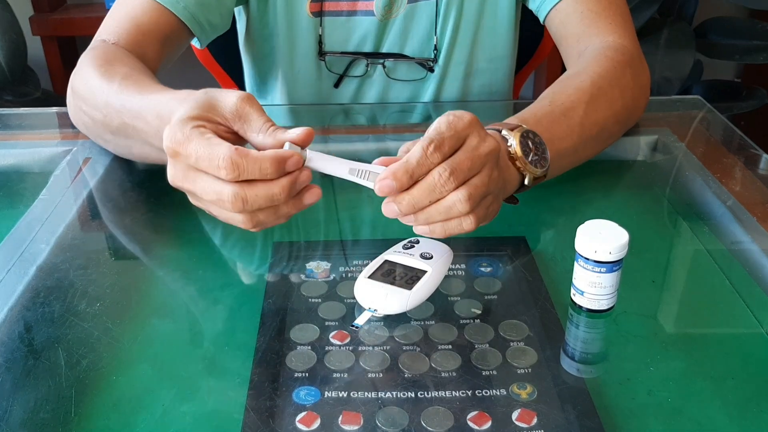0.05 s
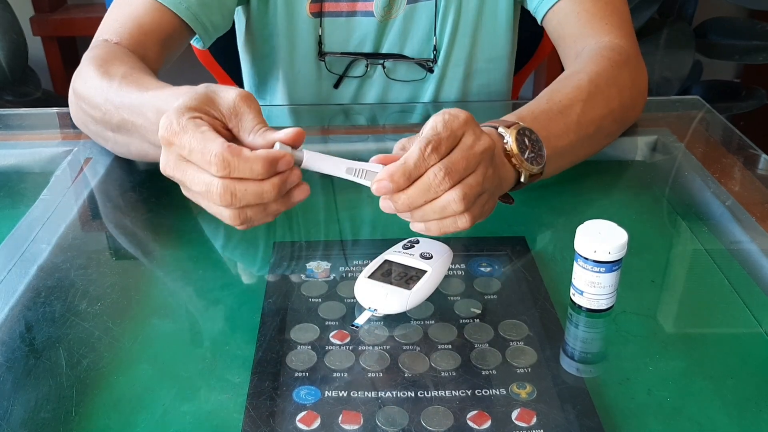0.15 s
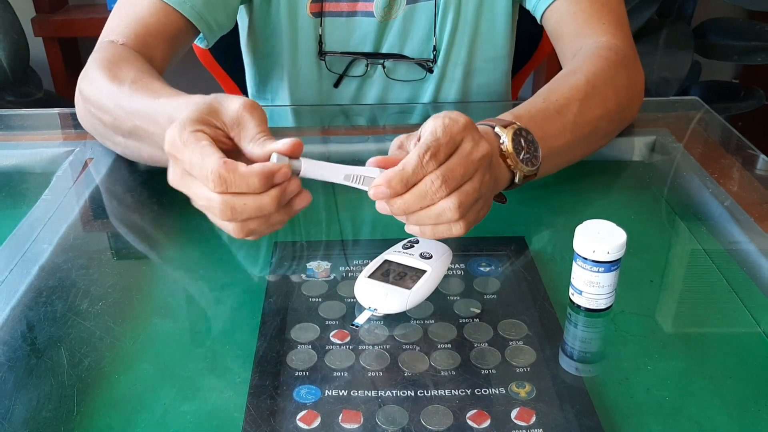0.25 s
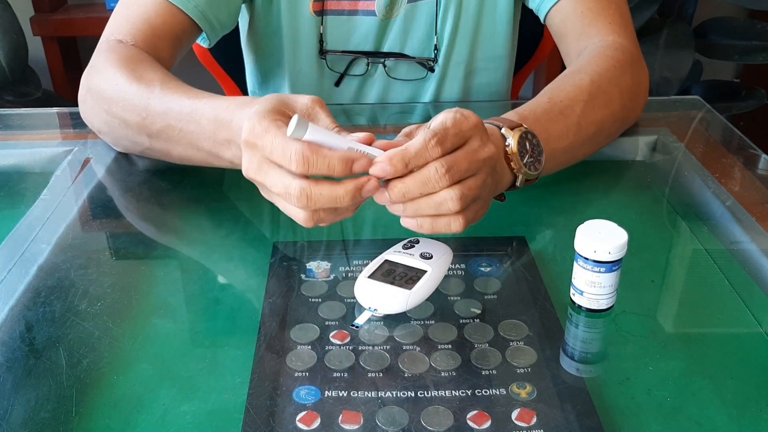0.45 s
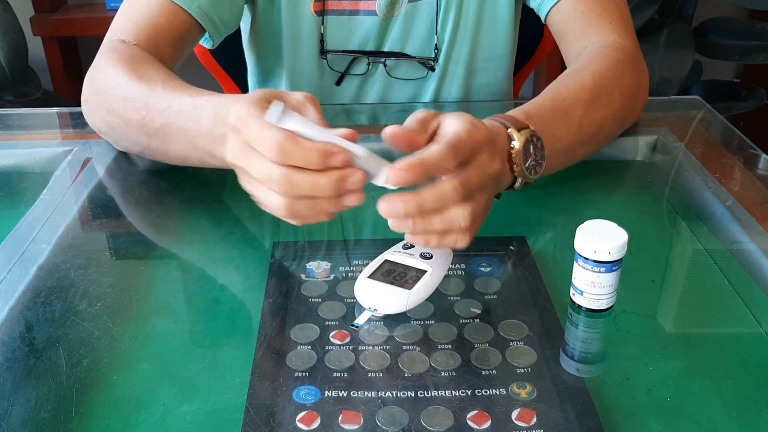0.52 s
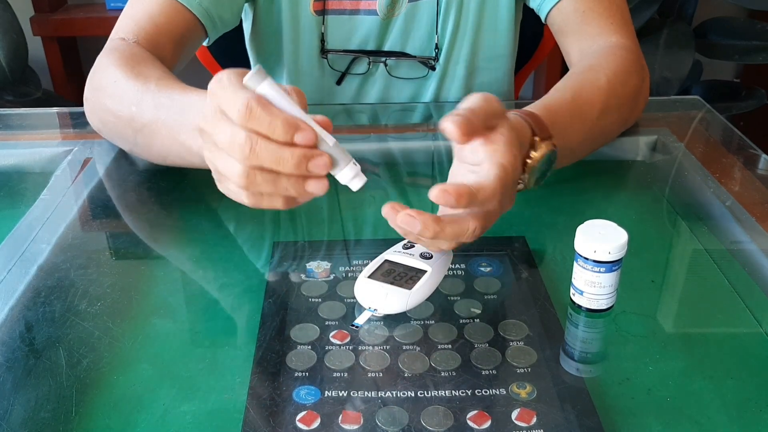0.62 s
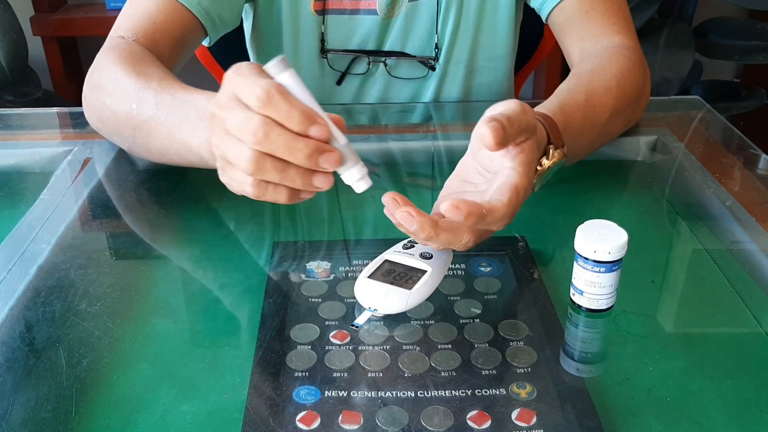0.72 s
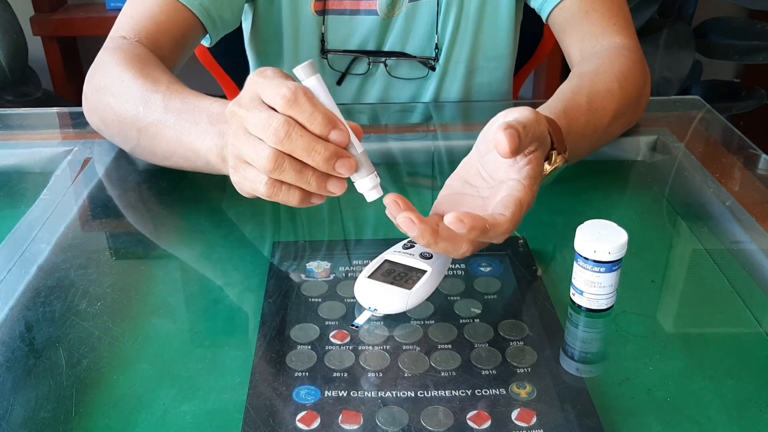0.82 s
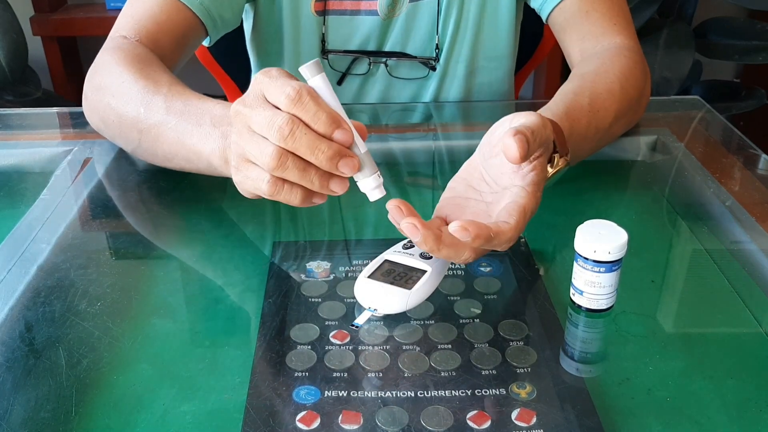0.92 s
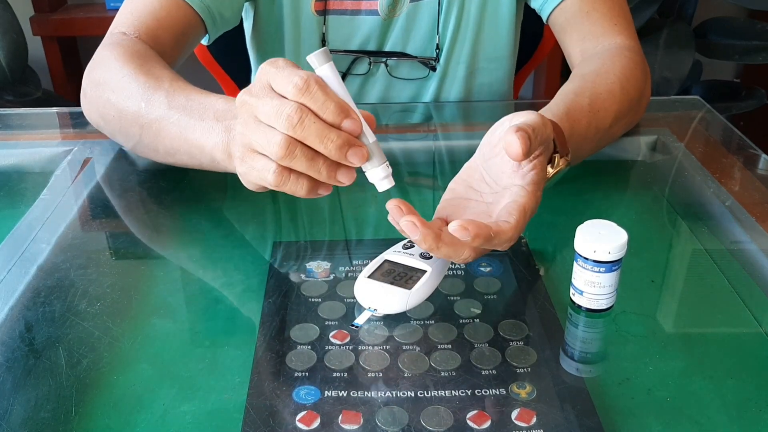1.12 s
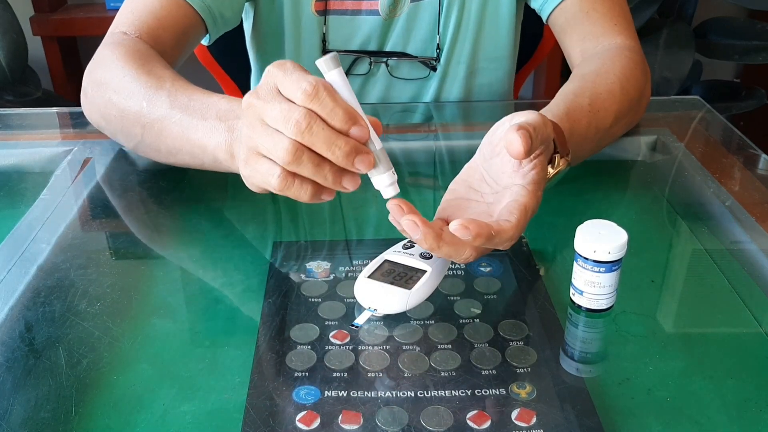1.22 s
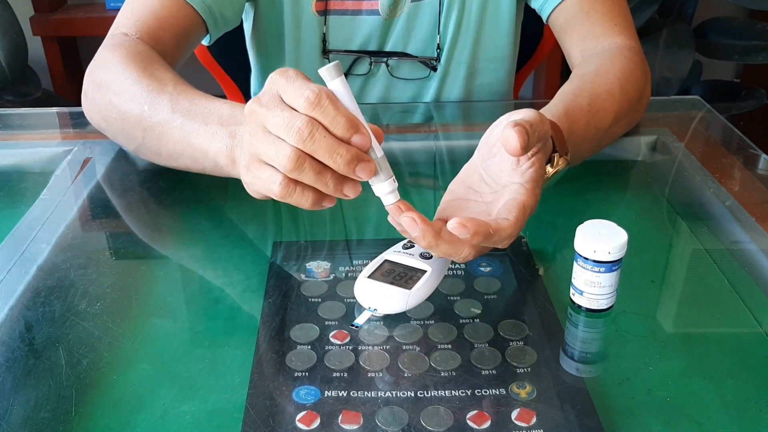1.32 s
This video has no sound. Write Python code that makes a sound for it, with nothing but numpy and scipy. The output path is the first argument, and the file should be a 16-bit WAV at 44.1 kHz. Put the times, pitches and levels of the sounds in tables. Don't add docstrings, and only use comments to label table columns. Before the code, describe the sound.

A spring-loaded plastic pen device is cocked: a small click, then a sharp snap, in a hard room

```python
import sys
import numpy as np
from scipy import signal
from scipy.fft import rfft, irfft, next_fast_len
from scipy.io import wavfile
from scipy.ndimage import uniform_filter1d, map_coordinates

SR = 44100
rng = np.random.default_rng(int(sys.argv[2]) if len(sys.argv) > 2 else 0)


def to_wav(s):
    ch = np.atleast_2d(s).T
    pcm = np.round(np.clip(ch, -1, 1) * 32767)
    wavfile.write(sys.argv[1], SR, pcm.astype(np.int16))


def amplitude_ratio(level_db):
    exponent = np.asarray(level_db, float) / 20
    return 10 ** exponent


N = 59535

# (pitch [Hz], width [Hz], level [dB])
SHELL_TONES = [(246.5, 460, -22.5), (1040, 220, -9), (1907, 170, -6), (2620, 450, -4.5), (3500, 500, -3.5),
               (4300, 580, 11), (6480, 1200, 1.5), (8610, 2700, 0.5), (10240, 1200, 4), (12300, 2200, 2),
               (14870, 1500, 1.5)]
LEFT_RIGHT = np.array([[1], [-1]])
SWAY_DB = 1.2


def unit(x):
    return x / np.sqrt(np.mean(x ** 2) + 1e-20)


def along(points, hz):
    f, value = np.transpose(points)
    return np.interp(np.log(hz + 1), np.log(f + 1), value)


def wobble(rate):
    knots = rng.standard_normal(int(N / SR * 40) + 4)
    return map_coordinates(knots, [np.arange(N) * rate / SR])


def filtered(x, response):
    m = next_fast_len(x.shape[-1] + 8192)
    spectrum = rfft(x, m) * response(np.fft.rfftfreq(m, 1 / SR))
    return irfft(spectrum, m)[..., :x.shape[-1]]


def resonances(peaks):
    def response(f):
        total = 0
        for k, (centre, width, db) in enumerate(peaks):
            damping = 1j * f * width
            total = total + (-1) ** k * amplitude_ratio(db) * damping / (centre ** 2 - f ** 2 + damping)
        return total
    return response


def rush(gain):
    # (pitch [Hz], likeness [-1 to 1])
    likeness = [(60, 0.74), (180, 0.83), (550, 0.46), (1650, -0.28), (4970, -0.16), (15000, -0.47)]

    def mid_side_gain(hz):
        turn = np.arccos(np.clip(along(likeness, hz), -1, 1)) / 2
        return gain(hz) * [np.cos(turn), np.sin(turn)]
    mid, side = filtered(rng.standard_normal((2, N)), mid_side_gain)
    return unit(np.array([mid + side, mid - side]))


def burst(length_s, alike):
    dies_s, right_lag_s = .007, .00013
    t = np.arange(2048) / SR
    fade = amplitude_ratio(-60 * np.maximum(t - length_s, 0) / dies_s)
    shape = np.sqrt(np.minimum(t / 0.000067, 1) * fade)
    z = rfft(rng.standard_normal((2, 2048)) * shape ** 2)
    evenness = np.sqrt(abs(uniform_filter1d(abs(z) ** 2, size=24, axis=1)) + 1e-9)
    a, b = irfft(z / evenness) * shape * np.sqrt(length_s * SR)
    turn = np.arccos(np.clip(alike, -1, 1)) / 2
    mid, side = np.cos(turn) * a, np.sin(turn) * b
    pair = np.array([mid + side, mid - side])
    return filtered(pair, lambda hz: np.exp(-2j * np.pi * hz * right_lag_s * np.array([[0], [1]])))


def room(x, t60_s, gap_s, build_s):
    hz, t, z = signal.stft(rng.standard_normal((2, SR * 3 // 4)), SR, nperseg=256)
    tail = signal.istft(z * amplitude_ratio(-60 * t / t60_s(hz)[:, None]), SR, nperseg=256)[1]
    t = np.arange(tail.shape[1]) / SR
    tail = tail * np.clip((t - gap_s) / build_s, 0, 1) ** .5
    return signal.fftconvolve(x[None], tail / np.linalg.norm(tail[0]), axes=1)


def add(out, x, s):
    i = round(s * SR)
    x = x[:, max(-i, 0):][:, :N - max(i, 0)]
    out[:, max(i, 0):max(i, 0) + x.shape[1]] += x


def in_room(s, sound, colour):
    # (pitch [Hz], time to fall 60 dB [s])
    ring_time = [(300, 0.54), (1000, .38), (2000, 0.31), (4000, 0.31), (8000, .3), (14000, .26)]
    out = np.zeros((2, N))
    add(out, sound, s)
    echoes = room(np.ones(1), lambda hz: along(ring_time, hz), gap_s=.004, build_s=.009)
    add(out, filtered(echoes, colour), s)
    return out


def echo_gain(db, length_s):
    return amplitude_ratio(db) * np.sqrt(length_s * SR) * 20


def clicks():
    # (level [dB], treble over bass [dB], barrel ring [dB], room [dB], knock [dB])
    contacts = [
        (-55, 5.5, -19, 2.5, 4),
        (-35.5, 1, 1, 3.5, 0.5),
        (-46.5, -1, 4, 6, -2),
        (-17, 5, -0.5, 4, -7.5),
    ]
    contact_times = [.1378, .2169, .3797, .4286]
    rattle_lengths = [.003, .0045, .002, .001]
    shell_pitches = [1.0, .89, .94, 1.0]
    # (pitch [Hz], width [Hz], level [dB])
    knock_tones = [(231, 520, 10), (986, 190, 26), (1574, 240, 28)]
    # (pitch [Hz], level [dB])
    room_colour = [(300, -21), (1000, -5), (2050, 3), (3200, -1.5), (4400, 0.5), (6000, -6), (11500, -4.5),
                   (15500, -9)]
    wet_db, room_ring_db = -24.5, -0.5
    out = np.zeros((2, N))
    jolt = np.eye(1, 2048) * amplitude_ratio(1.5 * LEFT_RIGHT)
    barrel = resonances([(2060, 200, 0)])
    for s, length, pitch, contact in zip(contact_times, rattle_lengths, shell_pitches, contacts):
        db, tilt_db, ring_db, echo_db, knock_db = contact

        def tilt(hz):
            return tilt_db * np.log2((hz + 1) / 4000) / 2
        shell = resonances([(c * pitch, w, g + tilt(c)) for c, w, g in SHELL_TONES])
        rattle = burst(length, alike=0.23)
        sound = filtered(rattle, lambda hz: shell(hz) + amplitude_ratio(11 + ring_db) * barrel(hz))
        wet = echo_gain(db + wet_db + echo_db, length)

        def colour(hz):
            walls = amplitude_ratio(along(room_colour, hz) + tilt(hz))
            return wet * (walls + amplitude_ratio(room_ring_db + ring_db / 2) * abs(barrel(hz)))
        out += in_room(s, amplitude_ratio(db + 2.5) * sound, colour)
        knock = amplitude_ratio(db + knock_db) * filtered(jolt, resonances(knock_tones))
        add(out, knock, s + length / 2)
    return out


def slide():
    out = np.zeros((2, N))
    scrape = filtered(burst(.008, alike=0), resonances(SHELL_TONES))
    add(out, amplitude_ratio(-52) * scrape, .4205)
    return out


def creaks():
    slip_levels = [
        -48.5,
        -64.5,
        -55,
        -47.5,
        -55,
    ]
    slip_times = [.1252, .1355, .147, .163, .187]
    slip_lengths = [.005, .007, .012, .0095, .008]
    creak_hz, wet_db = 1588, -33.5
    out = np.zeros((2, N))
    grip = resonances([(creak_hz, 200, 17), (1000, 300, 8), (2200, 900, 13)])
    t = np.arange(1024) / SR
    for s, db, length in zip(slip_times, slip_levels, slip_lengths):
        swell = np.sin(np.pi * np.minimum(t / length, 1)) ** .5
        hz = creak_hz * (1 + 0.059 * rng.standard_normal())
        squeak = swell * np.sin(2 * np.pi * hz * t)
        wet = echo_gain(db + wet_db, length)
        out += in_room(s, amplitude_ratio(db) * squeak * amplitude_ratio([[3], [-4]]), lambda f: wet * grip(f))
    return out


def birds():
    # (time [s], length [s], first pitch [Hz], last pitch [Hz], level [dB])
    chirps = [(-.07, 0.041, 5890, 4370, -62), (-.03, 0.044, 3965, 3850, -63),
              (0.743, .06, 3500, 4400, -75.5), (.81, 0.017, 4300, 5300, -67.5),
              (0.83, .05, 5090, 6000, -75.5), (0.896, 0.031, 5760, 4600, -77.5),
              (0.917, 0.05, 3874, 3300, -77), (1.186, 0.012, 5690, 4810, -59.5),
              (1.201, 0.033, 4900, 4230, -61), (1.229, 0.048, 4270, 4236, -64),
              (1.266, 0.037, 4135, 3500, -75.5)]
    warble_hz, yard_t60_s = 245, 0.589
    out = np.zeros((2, N))
    t = np.arange(4096) / SR
    for s, length, from_hz, to_hz, db in chirps:
        u = t / length
        glide = from_hz + (to_hz - from_hz) * np.minimum(u, 1)
        hz = glide + warble_hz * np.sin(2 * np.pi * 90 * t)
        swell = np.sin(np.pi * np.minimum(u, 1)) ** 0.088 * (u < 1)
        call = np.sin(2 * np.pi * np.cumsum(hz) / SR) * swell
        echoes = room(call, lambda f: yard_t60_s + 0 * f, gap_s=0, build_s=0.0047)
        add(out, amplitude_ratio(db + 4.5) * echoes, s)
    return out


def street_rumble():
    # (time [s], level [dB])
    street_levels = [(0.0, -65), (0.408, -65), (0.428, -63), (0.63, -71), (0.714, -62.5), (0.748, -71.5),
                     (1.184, -69.5), (1.35, -69.5)]
    # (pitch [Hz], level [dB per Hz])
    rumble_colour = [(15, -55), (25, -54.5), (43, -12.5), (92, 3.5), (134, -6.5), (205, -6), (311, -13.5),
                     (343, -14), (500, -25.5), (650, -34.5), (1100, -120)]
    t = np.arange(N) / SR
    level_db = np.interp(t, *np.transpose(street_levels)) + SWAY_DB * wobble(14)
    colour = [(11, -55)] + list(rumble_colour) + [(900, -38.5)]
    return amplitude_ratio(level_db + 1.5 * LEFT_RIGHT) * rush(lambda f: amplitude_ratio(along(colour, f)))


def air_hiss():
    # (pitch [Hz], level [dB per Hz])
    hiss_colour = [(400, -9.5), (800, -5.5), (2000, -6), (2900, -16.5), (4500, -9), (7500, -22),
                   (10000, -23), (13500, -16.5)]
    colour = [(150, -43.5)] + list(hiss_colour)
    return amplitude_ratio(-70) * rush(lambda f: amplitude_ratio(along(colour, f)))


def door_bustle():
    # (time [s], level [dB])
    bustle_levels = [(0, -69.5), (.1, -60.5), (.35, -70), (.7, -67.5), (.76, -79), (1.18, -82), (1.21, -71),
                     (1.35, -74.5)]
    # (pitch [Hz], width [Hz], level [dB])
    hollow_tones = [(1508, 95, -1.5), (2020, 95, -6), (700, 600, -12.5), (2500, 2700, -10.5),
                    (2800, 80, -9)]
    t = np.arange(N) / SR
    level_db = np.interp(t, *np.transpose(bustle_levels)) + SWAY_DB * wobble(17)
    return amplitude_ratio(level_db) * rush(lambda f: sum(abs(resonances([p])(f)) ** 2 for p in hollow_tones))


def motor_hum():
    hum_hz, from_s, to_s = 878, .93, 1.29
    t = np.arange(N) / SR
    passing = np.clip(np.minimum(t - from_s, to_s - t) / 0.035, 0, 1)
    tone = np.sin(2 * np.pi * hum_hz * t + wobble(15))
    return amplitude_ratio(-79 + 2.6 * wobble(21.24)) * passing * tone


def scene():
    pen = clicks() + slide() + creaks()
    air = (air_hiss() + door_bustle() + motor_hum()) * amplitude_ratio(0.7 * LEFT_RIGHT)
    return pen + birds() + street_rumble() + air


def low_pass(x):
    return signal.sosfilt(signal.butter(12, 16530, fs=SR, output="sos"), x)


def record(dry):
    def response(hz):
        notch_db = -5.5 * np.exp(-((hz - 8900) / 800) ** 2)
        edge_db = -20 * np.clip((hz - 15500) / 300, 0, 1)
        return (hz < 16400) * amplitude_ratio(edge_db + notch_db)
    return low_pass(filtered(dry, response))


dry = scene()
out = record(dry)
to_wav(out)
```